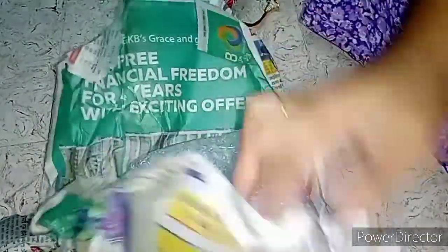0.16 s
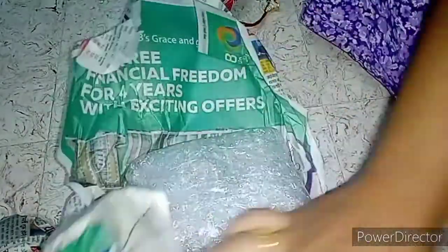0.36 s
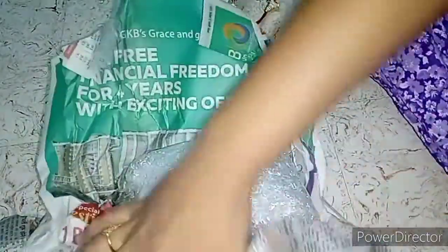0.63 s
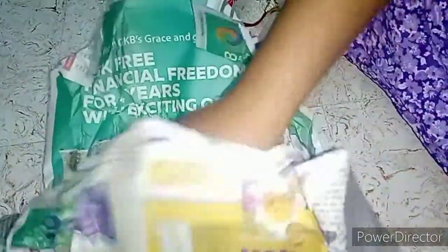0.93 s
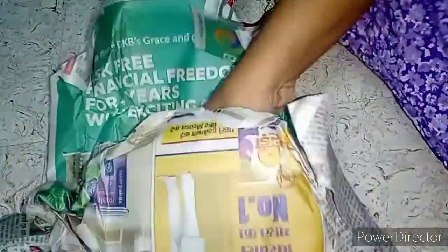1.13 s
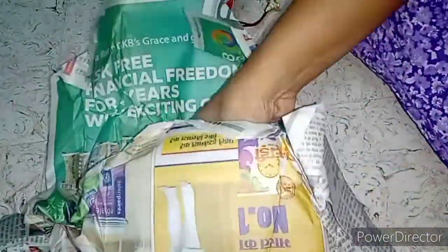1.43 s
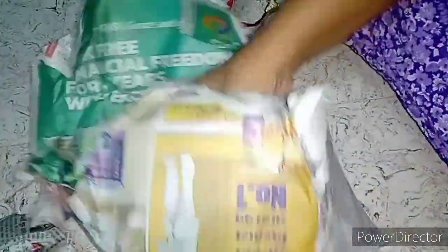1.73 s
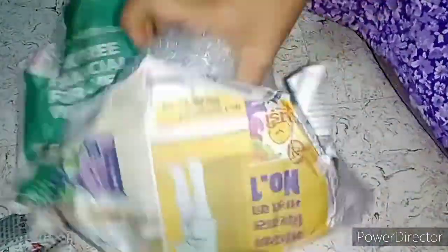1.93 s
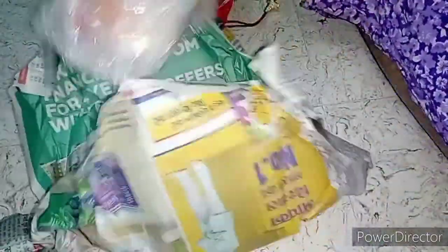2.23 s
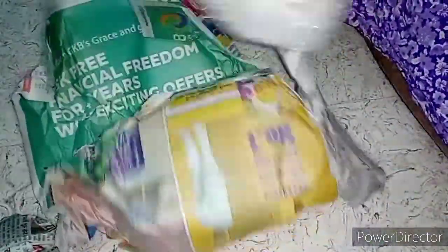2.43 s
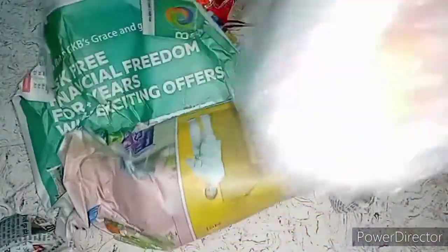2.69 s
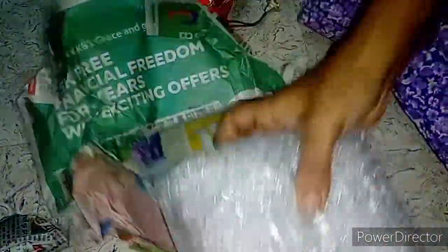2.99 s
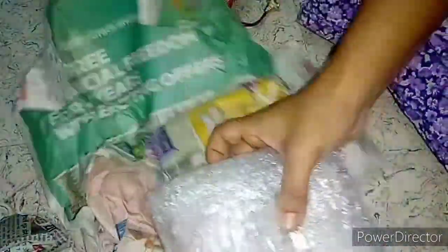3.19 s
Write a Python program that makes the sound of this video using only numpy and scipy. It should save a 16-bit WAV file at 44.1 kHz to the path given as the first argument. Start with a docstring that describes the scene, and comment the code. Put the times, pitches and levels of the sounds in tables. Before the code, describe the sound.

Paper wrapping rustles, crinkles and snaps close up, quiets down, then crackles loudly again at the end.

```python
"""Indoors, on a floor: a hand pulls newspaper packing apart, close to a small microphone.
The paper rustles: bands of noise burst with crinkles, hard ticks and briefly ringing patches.
Creases snap as spiky noise bursts with a click, a ring, a bright crack and a low boom.
A faint motor hum of wavering sines and rumble lies below; faint blurred whistles come late.
A noise suppressor thins the quiet parts and the top of the treble is cut."""
import sys
import numpy as np
from scipy import signal
from scipy.fft import rfft, irfft
from scipy.io import wavfile

SR = 44100
rng = np.random.default_rng(int(sys.argv[2]) if len(sys.argv) > 2 else 0)


def waveform_to_disk(signal):
    """Save audio, clipped to [-1, 1], as 16-bit WAV at the path in sys.argv[1]."""
    frames = np.transpose(np.atleast_2d(signal))
    scaled = np.clip(frames, -1, 1) * 32767
    samples = np.round(scaled).astype(np.int16)
    wavfile.write(sys.argv[1], SR, samples)


N = 147735   # length [samples]

# The rustle under the snaps: (time [s], treble level before RUSTLE_DB [dB],
# upper middle, middle and low band [dB above the treble])
RUSTLE_LEVELS = [(0.0, -52.5, 0, 8, 4), (0.03, -58, 5.5, 2, 0), (0.05, -48.5, 12.5, 10.5, 2),
                 (0.08, -57.5, 2, 10.5, 8.5), (0.15, -55.5, 5.5, 9.5, -14), (0.17, -50, 9.5, 5.5, 12),
                 (0.2, -58, 6, 6.5, 3), (0.42, -60, -0.5, 4, 1.5), (0.49, -58.5, -1, -0.5, -19),
                 (0.56, -56.5, -0.5, 3.5, -28), (0.66, -57, 0, 7, -6.5), (0.75, -56.5, -5, 2.5, -13),
                 (0.81, -56, -2, -0.5, -24), (0.85, -54, 2.5, 11, -5), (0.91, -61.5, 1.5, 3.5, 3),
                 (0.94, -61.5, 2, 6, -9), (0.96, -55.5, -1, 12.5, -19), (1.0, -56, 2, 2.5, 1.5),
                 (1.07, -57, -2.5, 0, -25), (1.19, -53.5, 0.5, 5, 1), (1.25, -59.5, -1, 2, -11),
                 (1.265, -54, 10, 8.5, -12), (1.32, -53, 1.5, 6.5, -11), (1.36, -60, 6, 4, -35),
                 (1.48, -53.5, 0, 7, -57), (1.52, -54.5, 3.5, 10, -14), (1.63, -57, 4.5, 8, -9),
                 (1.74, -53.5, -0.5, 2, -13), (1.8, -53, 2, 11, 4.5), (1.92, -57.5, 0, 3.5, -5.5),
                 (2.02, -56.5, 1.5, 6.5, -9), (2.15, -55, 0, -1, -5.5), (2.23, -63, 1, 7, 5),
                 (2.38, -60, 3.5, 3.5, 2.5), (2.44, -62, -2, -2, 4), (2.51, -62, -0.5, 5, -29),
                 (2.58, -66, -8, -18.5, -9), (2.74, -65.5, -12, -18, -14), (2.87, -63, 0, -18, -40),
                 (2.94, -60.5, 1.5, -5, -40.5), (3.03, -63.5, 2, -17, -40), (3.07, -65, 2, -1, -7),
                 (3.08, -61.5, -5, 19, -2), (3.16, -53.5, 10.5, 12, 10.5), (3.22, -52.5, -2, 8.5, 9),
                 (3.29, -47.5, 7, 14.5, 8), (3.35, -47, -0.5, 6, -1)]
# Where the low, middle, upper middle and treble levels apply: (frequency [Hz])
TILT_HZ = [400., 1100., 3000., 5200.]
# Colour of paper and microphone: (frequency [Hz], gain [dB])
PAPER_COLOUR = [(200, -24.5), (300, -7.5), (420, -5), (630, -0.5), (900, -10), (1450, -8.5), (2500, -9.5),
                (4200, -10.5), (6400, -9.5), (7900, -25), (10500, -22.5), (13700, -26.5), (14800, -22),
                (15700, -11)]
# Creases snapping: (time [s], relative level [dB], ring pitch [Hz], relative crack level [dB],
# time to fall 60 dB [s])
CREASE_SNAPS = [(0.047, -24.5, 905, -10.5, 0.03), (0.127, -20.5, 1710, -39, 0.02),
                (0.169, -16, 1430, -9, 0.015), (0.188, -31, 1380, -15, 0.051),
                (0.211, -30.5, 1240, -15, 0.047), (0.304, -33.5, 617, -25, 0.053),
                (0.543, -39, 3080, -6.5, 0.032), (0.626, -34.5, 860, -25, 0.044),
                (0.834, -29.5, 1660, -13, 0.021), (0.846, -35, 1320, -6.5, 0.038),
                (0.956, -29.5, 1030, -24, 0.014), (0.962, -30.5, 1830, -23, 0.052),
                (1.107, -32.5, 1690, -11, 0.029), (1.133, -33.5, 1200, -26, 0.031),
                (1.193, -36, 1760, -7.5, 0.053), (1.254, -24, 1420, -31, 0.024),
                (1.26, -26, 1110, -19, 0.022), (1.592, -34, 1500, -11, 0.019),
                (1.608, -36.5, 596, -12, 0.055), (1.705, -42, 626, -15, 0.04),
                (1.771, -36.5, 625, -6.5, 0.032), (1.862, -31, 556, -16.5, 0.028),
                (1.971, -31, 1530, -17.5, 0.036), (2.241, -28.5, 790, -24.5, 0.0086),
                (2.278, -36.5, 1880, -9, 0.029), (2.304, -38, 990, -14, 0.031),
                (2.367, -37, 1680, -4.5, 0.043), (2.498, -42.5, 2830, -8, 0.032),
                (2.813, -45.5, 5500, -7, 0.017), (2.877, -42.5, 5650, -8, 0.011),
                (2.915, -29.5, 4000, -13, 0.008), (2.935, -41, 3170, -11.5, 0.026),
                (2.999, -45.5, 3480, -1, 0.014), (3.079, -30, 1320, -19.5, 0.073),
                (3.13, -24, 900, -25, 0.018), (3.139, -20.5, 3240, -25, 0.023),
                (3.14, -21, 870, -20.5, 0.031), (3.163, -21, 470, -20, 0.02),
                (3.174, -18.5, 530, -26, 0.016), (3.202, -22, 5100, -8.5, 0.011),
                (3.219, -22.5, 1340, -14, 0.024), (3.232, -17, 413, -36, 0.0083),
                (3.235, -27.5, 4700, -10, 0.013), (3.259, -10, 980, -29, 0.024),
                (3.275, -15, 1300, -30, 0.02), (3.28, -15, 860, -11, 0.012),
                (3.282, -18, 650, -12.5, 0.011), (3.31, -30, 4950, -7, 0.0094)]
# The hum swells and fades: (time [s], level [dB], lowest line and deep noise above that [dB])
HUM_LEVELS = [(0.0, -62, -13), (0.06, -54, -33), (0.38, -58, -16), (0.4, -78, -18), (0.44, -61, -29),
              (0.61, -56.5, -14), (0.69, -51.5, -25), (1.05, -61, -10), (1.13, -61.5, -2.5),
              (1.29, -51.5, -11), (1.32, -60.5, 1.5), (1.66, -59.5, -5.5), (1.79, -49, -43),
              (2.01, -64.5, 1.5), (2.16, -52.5, -8), (2.25, -58, -29), (2.51, -74, -4), (2.84, -51, -34),
              (2.88, -56, -19), (3.18, -49.5, -16), (3.35, -49, -34)]
# Upper hum lines: (frequency at the start [Hz], level in the hum [dB])
HUM_LINES = [(121.5, -4), (148., -11.5), (174., -12)]
# One hum line with a level of its own: (time [s], level [dB])
SEPARATE_LINE_LEVELS = [(0, -73), (1.0, -68.5), (1.2, -56), (1.55, -66.5), (2.15, -66.5), (2.4, -92),
                        (2.9, -57.5), (3.35, -66)]
# Faint blurred whistles: (start [s], loudest [s], end [s], pitch [Hz], top level [dB],
# width of each resonance [Hz])
WHISTLES = [(2.3, 2.45, 2.92, 3370, -67, 120), (2.37, 2.48, 2.6, 2975, -67, 120),
            (2.935, 2.95, 3.03, 1150, -66, 120)]
# Noise that the suppressor expects: (frequency [Hz], level [dB per bin])
EXPECTED_NOISE = [(60, -71.5), (250, -74.5), (1000, -79.5), (3000, -83.5), (6000, -93), (15000, -104)]

# Rustle: each rate of drift is the corner of a low-pass
RUSTLE_DB = 18
CRINKLES_PER_S, CRINKLE_SPREAD_DB, CRINKLE_T60_S = 350, 3.5, .008
BROAD_DB, NARROW_DB, HISS_DB = -4, -6, -2   # crinkles in all bands, in two bands, sliding hiss
CLUMP_DB, CLUMP_RATE_HZ = .7, 12
PATCH_DB, PATCH_RATE_HZ = 1, 16.7   # each band also flickers alone
TICKS_PER_S, TICK_DB = 140, 19   # lone hard ticks, above the plain white noise
PANEL_HZ, PANEL_CYCLES = [303.4, 3220], 41.5   # flat patches ring this many cycles to -60 dB
PANEL_TAPS_PER_S, PANEL_DB = 210, -17.5

# Hum
HUM_WAVER_DB, WAVER_RATE_HZ = 2, 5.1   # each line alone
HUM_WOBBLE_DB, WOBBLE_RATE_HZ = 3, 19   # lines and noise together
HUM_RISE_PER_S = 0.00803   # share of the starting pitch; the lowest line stays put
SEPARATE_LINE_HZ, SEPARATE_WAVER_DB = 98.2, 6
LOWEST_HZ = 50.
DEEP_HZ, DEEP_DB = [41.8, 75.], -13
RUMBLE_HZ, RUMBLE_DB = [90., 185.], -6

# Snaps
RING_DB, RING_WIDTH = -14, 0.8   # width as a share of the pitch
CRACK_DB, CRACK_HZ = -3.5, [1420, 12600]
ATTACK_S, CLICK_DB = 0.00069, 18   # one hard click where the rise ends
BOOM_HZ, BOOM_T60_S = 310.5, 0.15
BOOM_DB, BOOM_DB_PER_OCTAVE = -15.5, -10   # the sheet booms more under low snaps

WHISTLE_FADE_DB = 10   # below the top at start and end
FLOOR_DB, FLOOR_HZ = -70, [200., 4060]   # faint hiss
SUPPRESS_DB, SUPPRESS_S = -10, 0.05   # lowest gain, averaging time
CUTOFF_HZ = 16200


def amp(db):
    """Decibels to gain."""
    return 10 ** (np.asarray(db) / 20)


def unit(x):
    """Scale to rms 1."""
    return x / np.sqrt(np.mean(x ** 2) + 1e-20)


def in_time(rows):
    """Table columns as curves over time."""
    s, *columns = np.transpose(rows)
    return [np.interp(np.arange(N) / SR, s, column) for column in columns]


def at_hz(points, hz):
    """Read a spectrum on a log frequency axis."""
    point_hz, level_db = np.transpose(points)
    return np.interp(np.log(hz), np.log(point_hz), level_db)


def band(x, low_hz, high_hz):
    """Butterworth band-pass."""
    edges = [low_hz, min(high_hz, .45 * SR)]
    return signal.sosfilt(signal.butter(2, edges, "band", fs=SR, output="sos"), x)


def drift(rate_hz):
    """Slow chance with spread 1: noise through two equal low-passes, at every 40th sample."""
    r = np.exp(-80 * np.pi * rate_hz / SR)
    noise = rng.standard_normal(N // 40 + 2002)
    slow = signal.lfilter([1], [1, -2 * r, r * r], noise)[2000:]   # settled part
    return np.interp(np.arange(N) / 40, np.arange(len(slow)), unit(slow))


def ring(x, hz, t60):
    """Two-pole resonance; a unit click rings with height about 1."""
    r, w = amp(-60 / (t60 * SR)), 2 * np.pi * hz / SR
    return signal.lfilter([0, np.sin(w)], [1, -2 * r * np.cos(w), r * r], x + 1e-18)


def papery(x):
    """Give a sound the colour of paper and microphone."""
    hz = np.arange(1, len(x) // 2 + 2) * SR / len(x)
    return irfft(rfft(x) * amp(at_hz(PAPER_COLOUR, hz)), len(x))


def crinkles():
    """Power envelope of tiny random buckles of uneven size, each dying fast; mean 1."""
    sizes = amp(2 * CRINKLE_SPREAD_DB * np.minimum(rng.exponential(1, N), 3))
    born = rng.random(N) < CRINKLES_PER_S / SR
    decay = amp(-120 / (CRINKLE_T60_S * SR))   # power, so twice the dB
    power = signal.lfilter([1], [1, -decay], sizes * born + 1e-18)
    return power / power.mean()


def tilt(hz, low_db, middle_db, upper_db):
    """Gain over the treble at one frequency, blended from the level curves."""
    low, middle, upper, _ = [np.interp(np.log(hz), np.log(TILT_HZ), row) for row in np.eye(4)]
    return amp(low * low_db + middle * middle_db + upper * upper_db)


def panels(tilt_curves):
    """Flat patches of paper: random taps dealt out to 40 short resonances."""
    out = 0
    taps = rng.standard_normal(N) * (rng.random(N) < PANEL_TAPS_PER_S / SR)
    pitches = np.geomspace(*PANEL_HZ, 40) * rng.uniform(.98, 1.02, 40)
    dealt = rng.integers(0, 40, N)
    for k, hz in enumerate(pitches):
        own_taps = tilt(hz, *tilt_curves) * taps * (dealt == k)
        out = out + amp(PANEL_DB) * ring(own_taps, hz, PANEL_CYCLES / hz)
    return out


def rustle():
    """Third-octave bands of noise bursting with broad and narrow crinkles in clumps, plus panels."""
    treble_db, upper_db, middle_db, low_db = in_time(RUSTLE_LEVELS)
    tilt_curves = low_db, middle_db, upper_db
    edges = 230 * 2 ** np.arange(0, 6.4, 1 / 3)
    broad = crinkles()
    narrow = [crinkles() for _ in range(len(edges) // 2)]
    white = rng.standard_normal((2, N))   # neighbouring bands take different noise
    ticks = amp(TICK_DB) * rng.standard_normal(N) * (rng.random(N) < TICKS_PER_S / SR)
    out = panels(tilt_curves)
    for k, (low, high) in enumerate(zip(edges, edges[1:])):
        crinkle_power = amp(2 * BROAD_DB) * broad + amp(2 * NARROW_DB) * narrow[k // 2]
        burst = np.sqrt(amp(2 * HISS_DB) + crinkle_power)
        grains = band(white[k % 2] * burst + ticks, low, high)
        flicker = amp(PATCH_DB * drift(PATCH_RATE_HZ))
        out = out + tilt(np.sqrt(low * high), *tilt_curves) * flicker * grains
    return amp(RUSTLE_DB + treble_db + CLUMP_DB * drift(CLUMP_RATE_HZ)) * papery(out)


def hum_line(hz, waver_db):
    """A sine of rms 1 before its random waver, its pitch creeping up."""
    t = np.arange(N) / SR
    cycles = hz * t * (1 + HUM_RISE_PER_S * t / 2) + rng.random()
    return np.sqrt(2) * amp(waver_db * drift(WAVER_RATE_HZ)) * np.sin(2 * np.pi * cycles)


def hum():
    """Motor lines about 25 Hz apart, each wavering on its own, over a soft rumble."""
    level_db, lowest_db = in_time(HUM_LEVELS)
    t = np.arange(N) / SR
    waver = amp(HUM_WAVER_DB * drift(WAVER_RATE_HZ))
    lowest = waver * np.sqrt(2) * np.sin(2 * np.pi * LOWEST_HZ * t)
    deep = amp(DEEP_DB) * unit(band(rng.standard_normal(N), *DEEP_HZ))
    rumble = amp(RUMBLE_DB) * unit(band(rng.standard_normal(N), *RUMBLE_HZ))
    upper = sum(amp(db) * hum_line(hz, HUM_WAVER_DB) for hz, db in HUM_LINES)
    together = upper + amp(lowest_db) * (lowest + deep) + rumble
    wobbling_level = amp(level_db + HUM_WOBBLE_DB * drift(WOBBLE_RATE_HZ))
    separate_level = amp(in_time(SEPARATE_LINE_LEVELS)[0])
    separate = separate_level * hum_line(SEPARATE_LINE_HZ, SEPARATE_WAVER_DB)
    return separate + wobbling_level * together


def snaps():
    """Each snap is a spiky noise burst: a broad ring at its own pitch, a bright crack and a low boom."""
    out, t = np.zeros(N + SR), np.arange(int(.12 * SR)) / SR
    for s, db, hz, crack_db, length in CREASE_SNAPS:
        noise = rng.standard_normal((2, len(t))) * rng.exponential(1, (2, len(t)))
        noise[:, int(ATTACK_S * SR) + 1] = amp(CLICK_DB)
        burst = noise * np.minimum(t / ATTACK_S, 1) * amp(-60 * t / length)
        half_width = 1 + RING_WIDTH / 2
        tone = amp(RING_DB) * unit(band(burst[0], hz / half_width, hz * half_width))
        crack = amp(CRACK_DB + crack_db) * unit(papery(band(burst[1], *CRACK_HZ)))
        boom_gain = amp(BOOM_DB + BOOM_DB_PER_OCTAVE * np.log2(hz / BOOM_HZ))
        boom = boom_gain * np.sin(2 * np.pi * BOOM_HZ * t) * amp(-60 * t / BOOM_T60_S)
        # longer snaps carry more energy
        size = np.sqrt(.004 * SR / len(t)) * np.sqrt(length / .02)
        i = int(s * SR)
        out[i:i + len(t)] += amp(db) * (size * (tone + crack) + boom)
    return out[:N]


def whistle():
    """Each tone is noise twice through a resonance, swelling and then fading in dB."""
    t, out = np.arange(N) / SR, 0
    for start, top, end, hz, db, width_hz in WHISTLES:
        t60 = 2.2 / width_hz
        times = [start - .03, start, top, end, end + .03]
        shape_db = np.interp(t, times, [-60, -WHISTLE_FADE_DB, 0, -WHISTLE_FADE_DB, -60])
        tone = ring(ring(rng.standard_normal(N), hz, t60), hz, t60)
        out = out + amp(db + shape_db) * unit(tone)
    return out


def suppress(x):
    """Noise suppressor: bins whose recent power is near the expected noise are turned down."""
    hz, _, spec = signal.stft(x, SR, nperseg=1024, noverlap=768)
    keep = np.exp(-256 / SR / SUPPRESS_S)
    power = abs(spec) ** 2
    recent = np.maximum(signal.lfilter([1 - keep], [1, -keep], power), .5 * power)
    noise_power = amp(2 * at_hz(EXPECTED_NOISE, hz + 1))[:, None]
    gain = np.maximum(1 - noise_power / (recent + 1e-20), amp(SUPPRESS_DB))
    return signal.istft(spec * gain, SR, nperseg=1024, noverlap=768)[1][:N]


def scene():
    """Paper, hum and whistles close to the microphone, over a faint hiss."""
    hiss = amp(FLOOR_DB) * unit(band(rng.standard_normal(N), *FLOOR_HZ))
    return (rustle() + hum() + snaps() + whistle() + hiss)[None]


def record(dry):
    """Noise suppressor, then a steep low-pass cuts the top."""
    top_cut = signal.cheby2(16, 80, CUTOFF_HZ, fs=SR, output="sos")
    return signal.sosfilt(top_cut, suppress(dry[0])[None])


dry = scene()
out = record(dry)
waveform_to_disk(out)
```